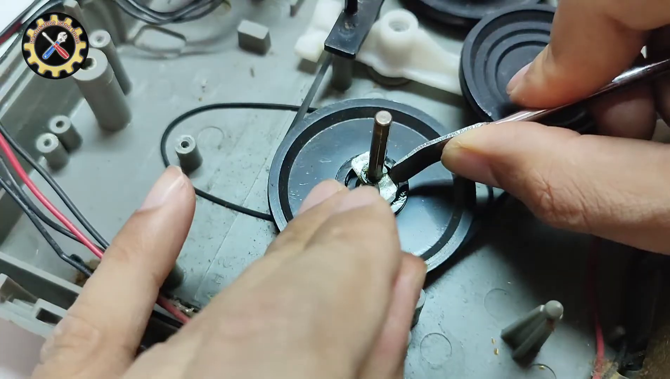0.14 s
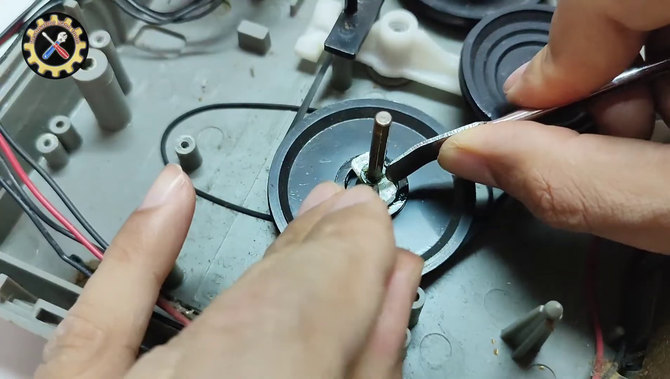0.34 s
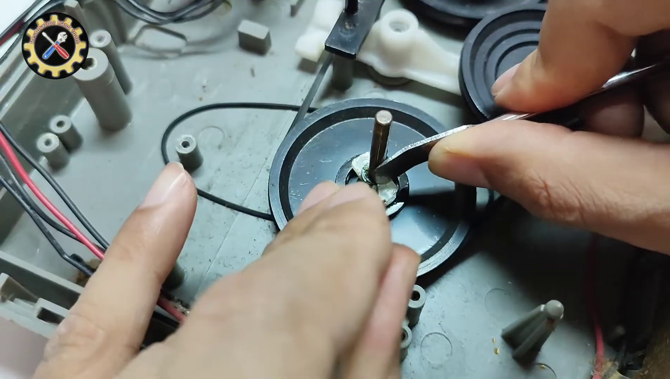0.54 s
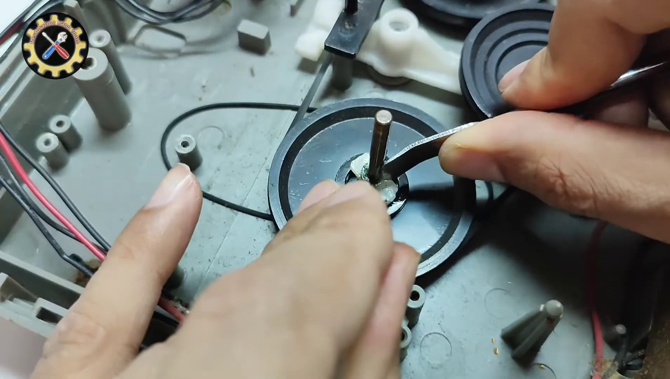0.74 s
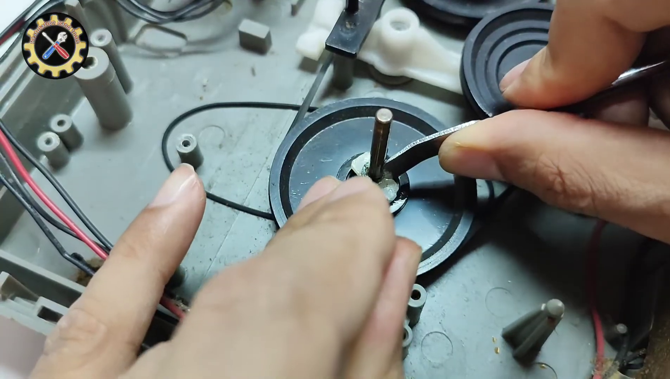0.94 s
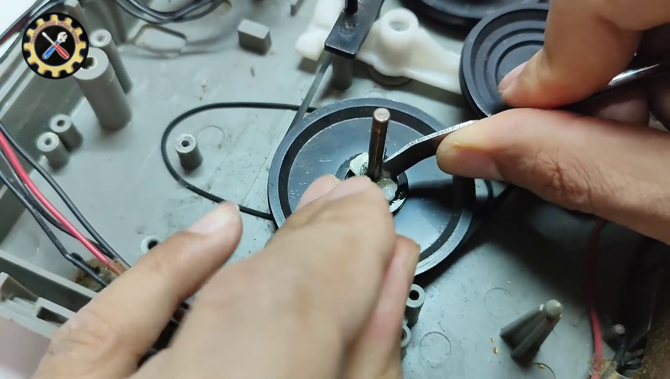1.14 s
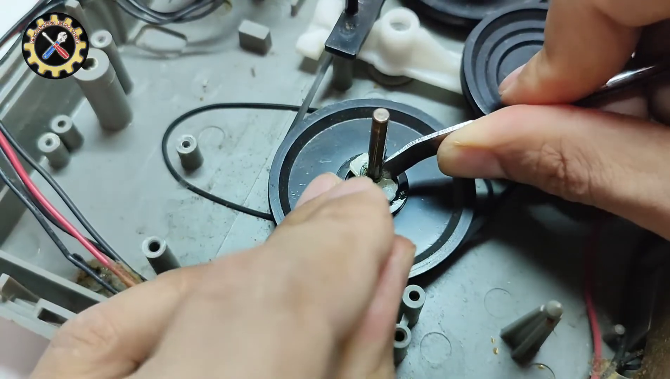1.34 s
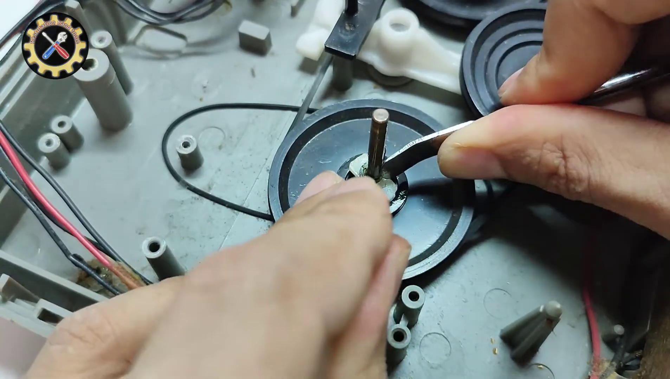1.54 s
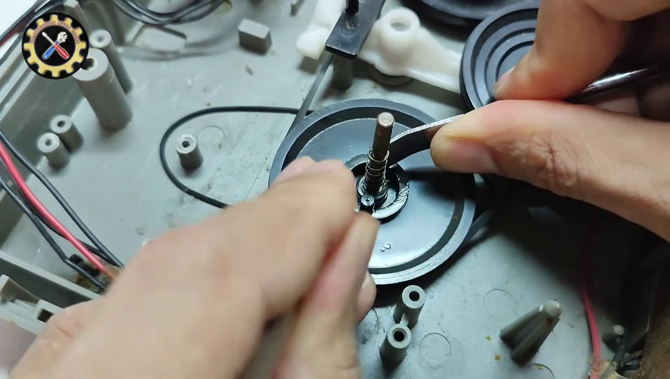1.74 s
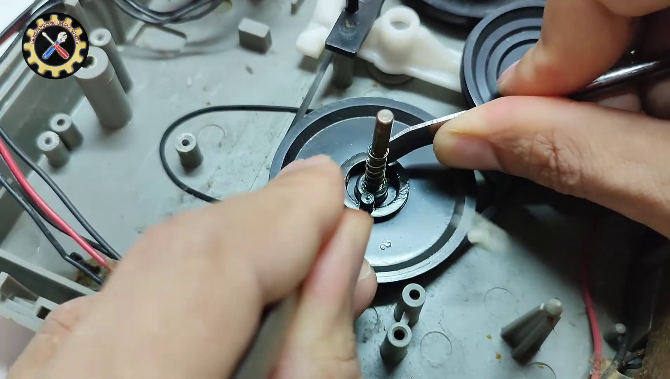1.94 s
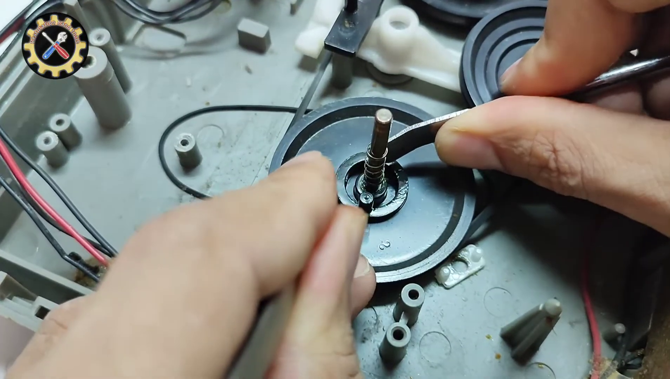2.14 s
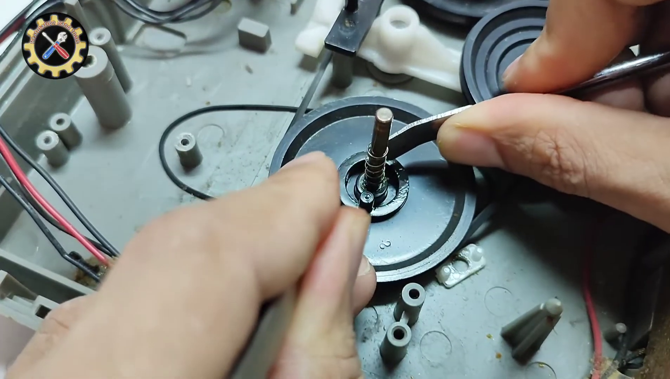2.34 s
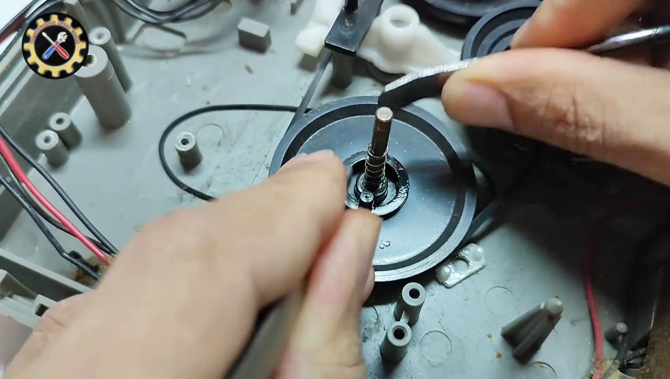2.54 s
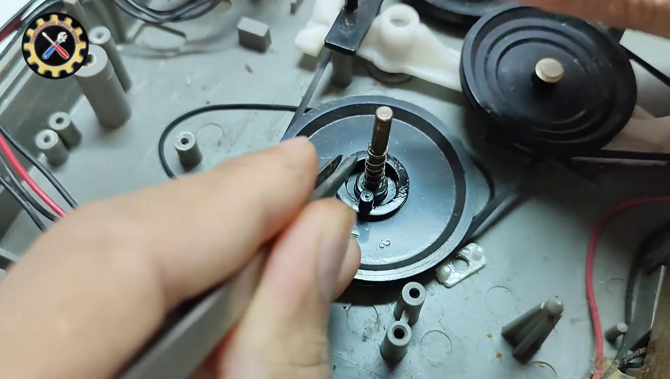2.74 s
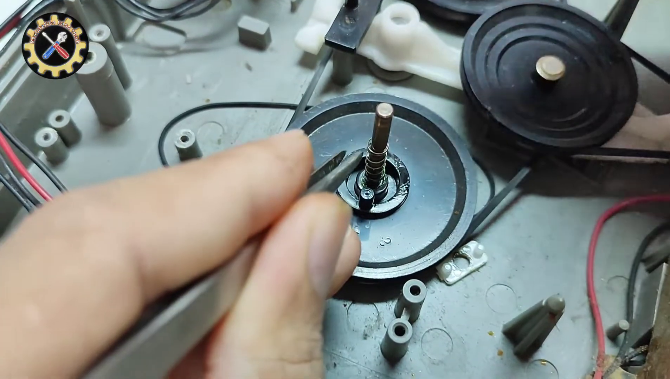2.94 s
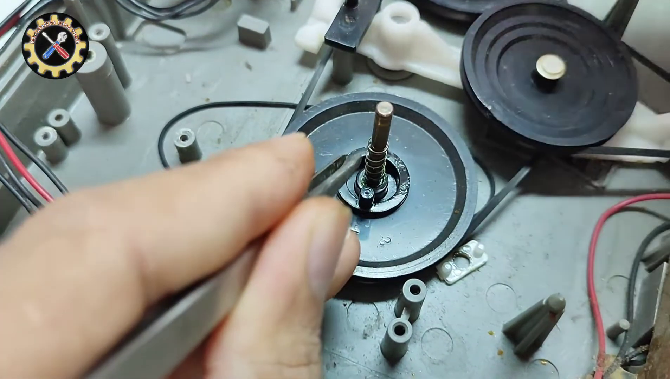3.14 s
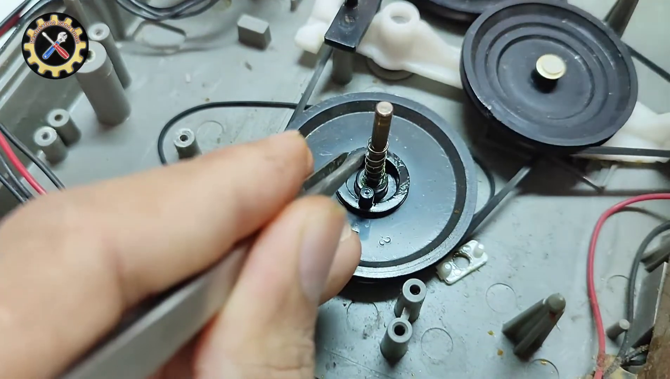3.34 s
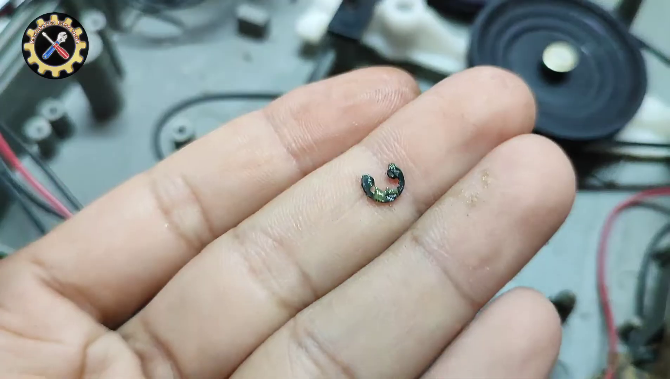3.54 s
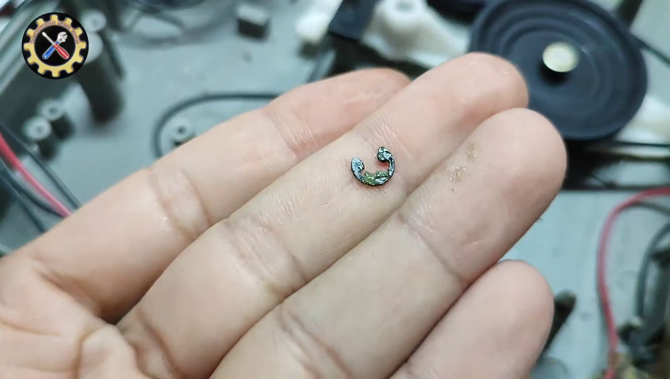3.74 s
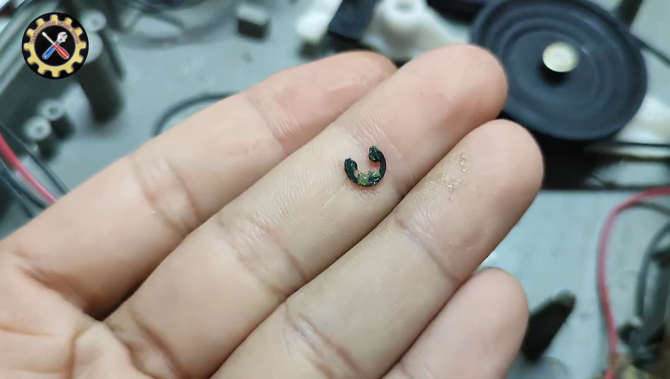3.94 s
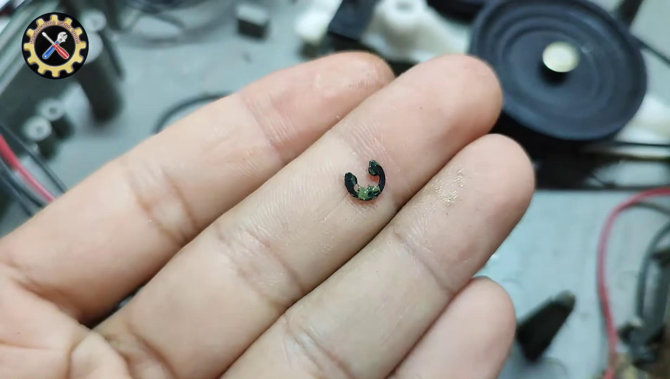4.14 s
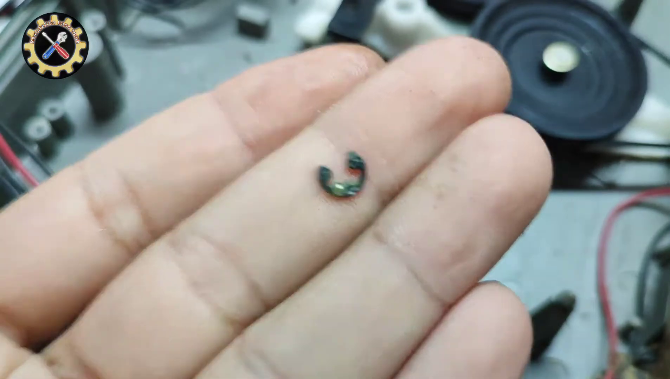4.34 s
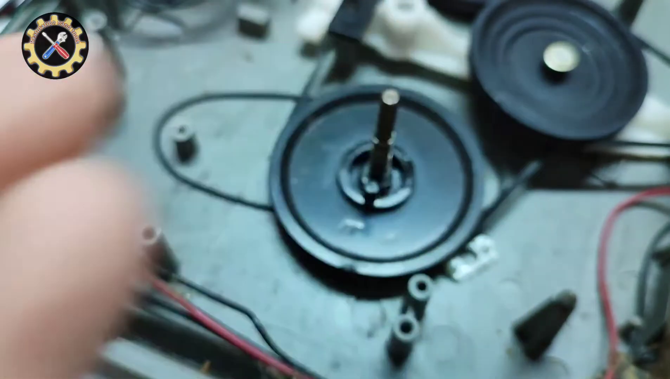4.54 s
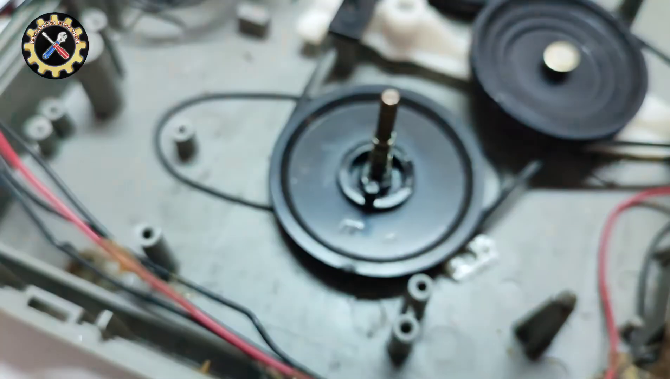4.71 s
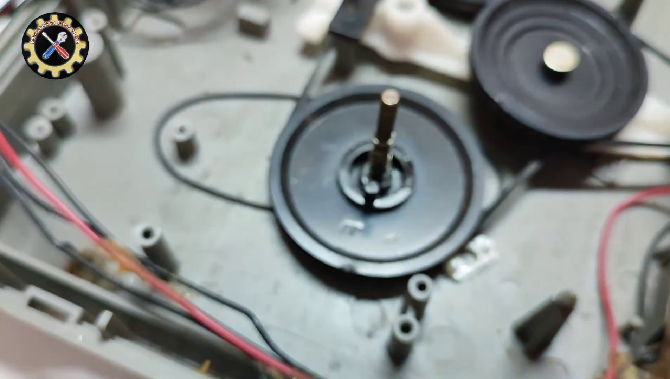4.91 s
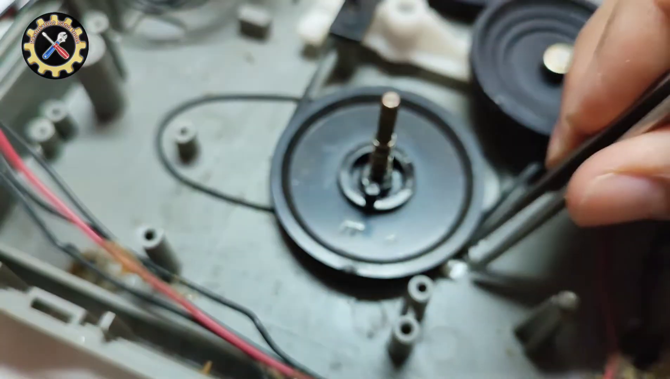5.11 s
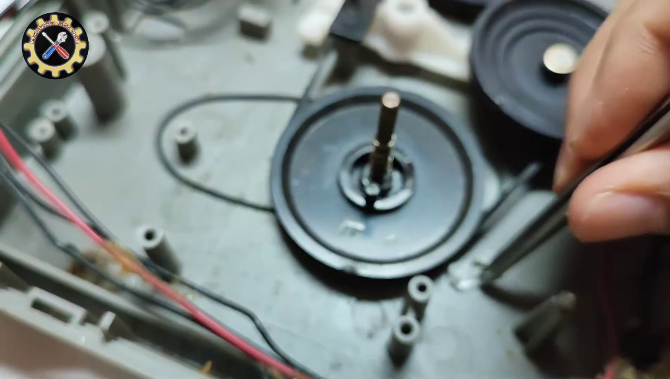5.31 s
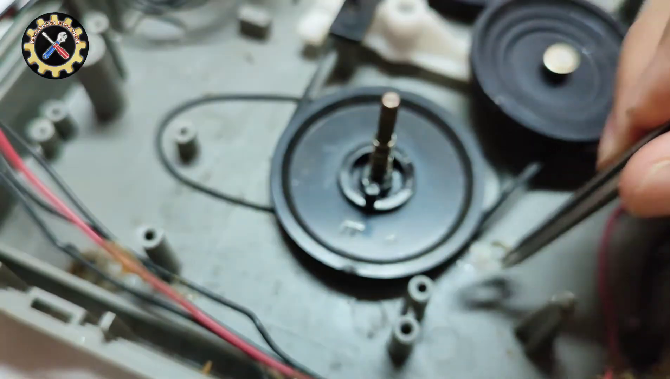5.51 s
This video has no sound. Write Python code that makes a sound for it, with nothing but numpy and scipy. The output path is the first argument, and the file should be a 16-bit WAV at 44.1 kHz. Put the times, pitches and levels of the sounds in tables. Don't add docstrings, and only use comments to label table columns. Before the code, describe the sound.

Very close microphone inside an opened plastic device. Soft skin rubs, light metal ticks and dull desk bumps lead to a sudden loud snap as a small ring springs off, jolting the left side. It hits the base sharply and skips to rest. Small ticks fade into faint room hum; near the end tweezers knock and drag briefly, with a soft low puff of air on the left.

```python
import sys
import numpy as np
from scipy import signal
from scipy.fft import rfft, irfft, next_fast_len
from scipy.io import wavfile

SR = 44100
rng = np.random.default_rng(int(sys.argv[2]) if len(sys.argv) > 2 else 0)


def transcribe(signal):
    frames = np.atleast_2d(signal).T
    limited = np.clip(frames, -1, 1)
    pcm = np.round(limited * 32767).astype(np.int16)
    wavfile.write(sys.argv[1], SR, pcm)


def elevation(decibels):
    levels = np.asarray(decibels, float)
    return 10 ** (levels / 20)


N = 250032
TIME = np.arange(N) / SR


def rms_one(x):
    return x / np.sqrt(np.mean(x ** 2) + 1e-20)


def at_hz(points, hz):
    table_hz, values = np.array(points)[:, 0], np.array(points)[:, 1]
    return np.interp(np.log(np.maximum(hz, 1)), np.log(table_hz), values)


def colour(x, spectrum):
    size = next_fast_len(x.shape[-1])
    gain = elevation(at_hz(spectrum, np.fft.rfftfreq(size, 1 / SR)))
    return irfft(rfft(x, size) * gain, size)[..., :x.shape[-1]]


def resonate(x, hz, width_hz):
    r = np.exp(-np.pi * width_hz / SR)
    poles = [1, -2 * r * np.cos(2 * np.pi * hz / SR), r * r]
    return signal.lfilter([(1 - r * r) / 2, 0, (r * r - 1) / 2], poles, x)


def resonate_twice(x, hz, width_hz):
    return resonate(resonate(x, hz, width_hz), hz, width_hz)


def struck(t, hz, t60, rise_s):
    return np.sin(2 * np.pi * hz * t) * elevation(-60 * t / t60) * (1 - np.exp(-t / rise_s))


def add(out, s, sound):
    i = round(s * SR)
    out[..., i:i + sound.shape[-1]] += sound[..., :N - i]


def balance(left_minus_right_db):
    return elevation(np.array([[left_minus_right_db], [-left_minus_right_db]]) / 2)


def clumps(size, seconds):
    step = max(round(seconds * SR), 8)
    knots = size // 8 + 2
    return np.interp(np.arange(size) / step, np.arange(knots), rng.standard_normal(knots))


def stroke(t, start, hold, db, rise_db_s, fall_db_s):
    early = np.maximum(start - t, 0)
    late = np.maximum(t - start - hold, 0)
    return elevation(db - rise_db_s * early - fall_db_s * late)


# pitch_hz, level_db
AIR = [(8, -0.5), (20, -3.5), (40, -11.5), (62, -10), (85, -16), (130, -12), (200, -10.5), (280, -15.5),
       (500, -18.5), (700, -28.5), (1500, -32.5), (6000, -41.5), (10000, -45), (13500, -42)]
# pitch_hz, correlation (-1 to 1)
LIKENESS = [(60, 0.64), (150, 0.85), (380, 0.58), (950, -0.33), (2380, -0.16), (5980, -0.01),
            (15000, -0.43)]
# pitch_hz, width_hz, level_db
HUMS = [(54.25, 4, -67.5), (190, 7.8, -73), (967, 99, -89), (356, 30, -82), (1340, 4, -94), (1707, 4, -95)]


def room_tone():
    size = next_fast_len(N)
    mid, side = rfft(rng.standard_normal((2, size)))
    hz = np.fft.rfftfreq(size, 1 / SR)
    alike = np.clip(at_hz(LIKENESS, hz), -1, 1)
    both = np.sqrt(1 + alike) * mid + np.sqrt(1 - alike) * side * [[1], [-1]]
    hush = elevation(-62) * rms_one(irfft(both * elevation(at_hz(AIR, hz)), size)[:, :N])
    hums = np.zeros(N)
    for pitch_hz, width_hz, db in HUMS:
        hums += elevation(db) * rms_one(resonate_twice(rng.standard_normal(N), pitch_hz, width_hz * 1.2))
    return (hush + hums) * balance(2.4)


def rubbing(strokes, spectrum, modes, ring, sung_db, rise_db_s, fall_db_s):
    out = np.zeros((2, N))
    sharp = signal.butter(2, 3500, "high", fs=SR, output="sos")
    for start, hold, db, bright_db in strokes:
        t = max(start - 0.12, 0) + TIME[:SR // 2]
        slips = rng.standard_normal((3, len(t))) * elevation(2.5 * clumps(len(t), 0.005))
        slips = slips[:2] + 0.4 * slips[2]
        sung = np.zeros((2, len(t)))
        for hz, width_hz, mode_db in modes:
            waver = elevation(mode_db + 4.5 * clumps(len(t), 0.0201))
            sung += waver * resonate(slips, hz, width_hz * ring)
        grain = rms_one(colour(slips + elevation(sung_db) * sung, spectrum))
        highs = signal.sosfilt(sharp, grain)
        envelope = stroke(t, start, hold, db + 2.0, rise_db_s, fall_db_s)
        add(out, t[0], envelope * (grain + (elevation(bright_db) - 1) * highs))
    return out


# pitch_hz, width_hz, level_db
PARTS = [(700, 170, 3.5), (1050.6, 420, 1.5), (1420, 300, 3), (2000, 490, 3.5), (2600, 500, 0.5),
         (3300, 800, -2.5), (4180, 450, -1), (4800, 370, -5), (5700, 420, 1), (6488, 550, 0),
         (7612, 1500, -2.5), (8980, 940, 0.5), (10280, 1000, -0.5), (11120, 1300, -1.5), (12500, 390, -2),
         (13730, 380, -5.5)]
# start_s, hold_s, level_db, brightness_db
RUB = [(0.0, 0.032, -68, 2.5), (.155, 0.016, -74, 1), (.275, .012, -76.5, 4), (.565, 0.058, -64, 0),
       (.725, 0.11, -71.5, 1.5), (1.645, .02, -69, -6), (2.35, 0.038, -81.5, 0.5), (2.49, .17, -72, 1.5),
       (2.91, 0.14, -76.5, 7.5), (3.065, 0.022, -65.5, 2.5), (3.27, .1, -83.5, 3.5)]
# pitch_hz, level_db
RUB_COLOUR = [(150, -10.5), (300, 5.5), (1000, -6), (1400, -12), (2300, -7.5), (4000, -16), (7000, -16.5),
              (9500, -25), (14500, -27.5)]


def finger_rubs():
    return rubbing(RUB, RUB_COLOUR, PARTS, ring=0.47, sung_db=-3.5, rise_db_s=304, fall_db_s=260.5)


def room_tail(spectrum):
    t = TIME[:SR // 3]
    lumps_db = 1.6 * np.clip(clumps(len(t), .003), -2, 1.5)
    gate_db = 347 * np.maximum(t - 0.13, 0)
    fade_db = lumps_db - 93.5 * t - gate_db
    ripple = elevation(2.3 * clumps(len(t) // 2 + 1, .0006))
    noise = irfft(rfft(rng.standard_normal((2, len(t)))) * ripple, len(t))
    wash = rms_one(colour(noise, spectrum))
    lows = signal.lfilter(*signal.butter(1, 5000, fs=SR), wash)
    highs = (wash - lows) * elevation(-41 * t)
    return (lows + highs) * elevation(fade_db) * np.minimum(t / 0.005, 1)


def contacts(events, tail_colour, pan_db, ring):
    out, t = np.zeros((2, N)), TIME[:SR // 32]
    for s, peak_db, centre_hz, spread_db, chatter_s, wet_db in events:
        swell = (1 - np.exp(-t / .0003)) * np.exp(-t / max(chatter_s, 5e-4))
        force = 1.5 + rng.exponential(1, len(t))
        impacts = rng.standard_normal((2, len(t))) * force * swell
        body, sign = np.zeros((2, len(t))), 1
        for hz, width_hz, db in PARTS:
            near_db = db - spread_db * abs(np.log2(hz / centre_hz))
            gain = sign * elevation(near_db + rng.normal(0, 1.5))
            body += gain * resonate_twice(impacts, hz, width_hz * ring)
            sign = -sign
        add(out, s, elevation(peak_db + 5) * body / np.abs(body).max())
        add(out, s, elevation(peak_db + wet_db - 18) * room_tail(tail_colour))
    return out * balance(pan_db)


# start_s, peak_db, centre_hz, spread_db_per_octave
TICKS = [(.0164, -50.5, 3950, 5), (.0598, -51, 2600, 8), (.135, -66, 2000, 23), (0.5763, -47.5, 3360, 9.5),
         (.594, -52, 5140, 23), (.824, -54, 2600, 20), (1.394, -52.5, 1390, 7.5), (1.416, -71, 7000, 16),
         (1.4345, -51, 1660, 14), (1.513, -61, 2000, 3.5), (1.640, -56, 3500, 4), (1.956, -64, 2930, 16),
         (2.464, -58, 4020, 4), (2.555, -61.5, 1950, 19), (2.573, -43.5, 2150, 8.5),
         (2.635, -63, 5470, 5.5), (2.655, -62.5, 4000, 6), (2.947, -60.5, 3250, 32),
         (3.078, -58.5, 2600, 14), (3.87, -65.5, 2992, 10.5), (4.59, -71, 11000, 3.5),
         (5.1990, -40, 1230, 5.5), (5.25, -51.5, 3300, 8), (5.604, -60.5, 3180, 10)]


def tweezer_ticks():
    chatter_s, wet_db = 0.0049, -16
    ticks = [(*tick, chatter_s, wet_db) for tick in TICKS]
    return contacts(ticks, RUB_COLOUR, pan_db=1.5, ring=1.0)


# start_s, peak_db, pitch_hz, t60_s
BUMPS = [(0.018, -55, 102, 0.15), (0.288, -45, 102, 0.044), (0.329, -54, 88, 0.09),
         (0.544, -57.5, 136.6, 0.17), (0.567, -50, 102, 0.14), (0.793, -59, 109, 0.14),
         (1.267, -52, 94.4, 0.064), (1.34, -51, 87, 0.034), (1.39, -50, 134, 0.057),
         (1.408, -44.5, 126, 0.14), (1.439, -50, 94, 0.057), (1.462, -47.5, 118.3, 0.13),
         (1.639, -47, 94, 0.14), (2.01, -50.5, 102, 0.062), (2.509, -52.5, 102, 0.072),
         (2.538, -54.5, 85.9, 0.11), (2.999, -57.5, 129.9, 0.081), (5.199, -48.5, 111.1, 0.06),
         (5.596, -70.5, 111.4, 0.063)]


def desk_bumps():
    out, t = np.zeros(N), TIME[:SR // 3]
    for s, peak_db, hz, t60 in BUMPS:
        t60 = max(t60, .02)
        modes = struck(t, hz, t60, 0.0025)
        modes += elevation(-10) * struck(t, 2.3 * hz, .6 * t60, 0.0031)
        modes += elevation(-14.5) * struck(t, 2.5 * hz, 0.59 * t60, .004)
        add(out, s, elevation(peak_db + 8.5) * modes)
    return out


# start_s, hold_s, level_db, brightness_db
PRESS = [
    (1.3, .05, -71.5, 3),
    (1.398, 0.021, -58.5, 3),
    (1.437, 0.016, -53.5, -4),
    (1.48, 0.051, -76, 2),
]
# pitch_hz, level_db
PRESS_COLOUR = [(120, -23), (200, 5.5), (556, -4), (641, -12), (854, -5.5), (1390, -20), (2460, -17.5),
                (4520, -41), (4770, -35), (7210, -24.5), (14500, -61)]


def finger_presses():
    return rubbing(PRESS, PRESS_COLOUR, PARTS, ring=0.99, sung_db=-6.5, rise_db_s=448, fall_db_s=600)


# start_s, peak_db, centre_hz, chatter_s, wet_db
SNAP = [
    (1.667, -45, 3004, 0.012, -30),
    (1.6743, -28.5, 7000, .004, -35),
    (1.6773, -9, 9540, 0.002, -8.5),
    (1.6903, -12.5, 11460, .002, -16),
    (1.7205, -26, 4800, 0.004, -7.5),
    (1.7245, -22.5, 9120, .003, -7.5),
    (1.7305, -36, 3000, .005, -12),
]
# pitch_hz, level_db
SNAP_COLOUR = [(88, -36), (150, -3.5), (302, -3.5), (519, -12.5), (668, -6.5), (1020, -19), (1110, -9),
               (1730, -11), (11100, -13.5), (14300, -20), (15500, -80.5)]


def ring_snap():
    spread_db = 3
    snaps = [(s, db, hz, spread_db, chatter_s, wet_db) for s, db, hz, chatter_s, wet_db in SNAP]
    return contacts(snaps, SNAP_COLOUR, pan_db=4.5, ring=2.08)


def panel(knocks, modes, pan_db):
    out, t = np.zeros(N), TIME[:SR // 4]
    for s, peak_db in knocks:
        ringing = np.zeros(len(t))
        for hz, db, t60 in modes:
            gain = rng.choice([-1, 1]) * elevation(peak_db + db - 6 + rng.normal(0, 1.5))
            ringing += gain * struck(t, hz, t60, 0.0002)
        add(out, s, ringing)
    return out * balance(pan_db)


# start_s, peak_db
SHUDDERS = [(1.669, -37.5), (1.677, -22), (1.683, -24.5), (1.691, -22.5), (1.70, -39), (1.722, -34),
            (1.755, -38), (1.77, -38), (1.785, -39), (1.80, -40), (1.84, -46.5)]
# pitch_hz, level_db, t60_s
CHASSIS = [(102, 0.5, 0.062), (218, -0.5, 0.08), (263.3, 0, 0.14), (344, -10, 0.12), (415, -9.5, .07),
           (559, -8, 0.081), (782.6, -12, 0.06)]


def chassis_shudder():
    return panel(SHUDDERS, CHASSIS, pan_db=6.5)


# start_s, size (full scale), rise_s, fall_s
JOLT = [
    (1.6776, -.37, .0004, .024),
    (1.6776, .075, .03, .17),
    (1.778, .082, .006, .1),
]


def capsule_jolt():
    offset = np.zeros(N)
    for s, size, rise_s, fall_s in JOLT:
        t = np.maximum(TIME - s, 0)
        offset += size * (1 - np.exp(-t / rise_s)) * np.exp(-t / fall_s)
    no_dc = signal.butter(1, .5, "high", fs=SR)
    return signal.lfilter(*no_dc, offset) * [[1], [0]]


# start_s, peak_db, centre_hz, spread_db_per_octave, chatter_s
BOUNCE = [
    (2.0175, -25, 6030, 3, 0.011),
    (2.0204, -9, 5000, 3, .0024),
    (2.0569, -17, 12500, 7, 0.0037),
    (2.0600, -15.5, 5202, 11, 0.004),
    (2.1104, -25.5, 3270, 7, 0.004),
    (2.144, -38.5, 2340, 13, 0.0035),
]
# pitch_hz, level_db
BOUNCE_COLOUR = [(350, -38), (600, -3), (1860, -10.5), (2440, 1.5), (5980, -1), (7640, -2), (10600, -7.5),
                 (12100, -2), (14700, -14), (15500, -56)]


def part_bounces():
    bounces = []
    for hit in BOUNCE:
        wet_db = -20.5 if hit[0] > 2.04 else -9.5
        bounces.append((*hit, wet_db))
    too_small = signal.butter(4, 680, "high", fs=SR, output="sos")
    return signal.sosfilt(too_small, contacts(bounces, BOUNCE_COLOUR, pan_db=-0.7, ring=2.07))


# start_s, peak_db
KNOCKS = [
    (2.019, -41),
    (2.576, -45),
    (5.202, -34),
    (5.205, -40),
    (5.214, -38),
    (5.237, -47),
]
# pitch_hz, level_db, t60_s
PLATE = [(244, -7, 0.051), (278.9, -7.5, 0.063), (358, -9, 0.13), (485, -2.5, .08), (566, -11, 0.047),
         (714, -5.5, 0.046), (936, -10, 0.024), (1247, -10, 0.078)]


def plate_knocks():
    return panel(KNOCKS, PLATE, pan_db=3.0)


# start_s, hold_s, level_db, brightness_db
DRAG = [
    (5.21, .025, -76, -8),
    (5.246, .02, -57.5, 2.5),
    (5.275, 0.036, -64, 1),
    (5.35, 0.046, -66, 2),
]
# pitch_hz, level_db
DRAG_COLOUR = [(300, -3.5), (480, -4), (710, -4.5), (1000, -7), (1600, -13.5), (2300, -17), (3300, -12),
               (4500, -19), (14500, -31)]
# pitch_hz, width_hz, level_db
TINES = [(479, 35, 0), (710, 27, 5.5), (880, 42, -18), (1750, 70, 2), (2170, 44, 4.5), (2670, 40, -3),
         (3300, 41, -4), (4950, 90, -9.5), (6430, 90, 4.5)]


def tweezer_drag():
    return rubbing(DRAG, DRAG_COLOUR, TINES, ring=0.95, sung_db=8, rise_db_s=500, fall_db_s=450)


# start_s, hold_s, level_db
DRAUGHT = [
    (5.36, 0.035, -44),
    (5.435, 0.0063, -42),
    (5.476, 0.17, -59.5),
]


def hand_draught():
    band = signal.butter(2, [20, 90], "band", fs=SR, output="sos")
    gusts = rms_one(signal.sosfilt(band, rng.standard_normal(N)))
    puffs = sum(stroke(TIME, *puff, rise_db_s=901, fall_db_s=402) for puff in DRAUGHT)
    return gusts * puffs * [[1], [0]]


def scene():
    handling = finger_rubs() + tweezer_ticks() + desk_bumps() + finger_presses()
    release = ring_snap() + chassis_shudder() + capsule_jolt()
    landing = part_bounces() + plate_knocks()
    return room_tone() + handling + release + landing + tweezer_drag() + hand_draught()


def band_limit(x):
    return signal.sosfilt(signal.butter(12, 16290, fs=SR, output="sos"), x)


def record(dry):
    rounded = np.tanh(dry)
    top_cut = signal.cheby1(12, .5, 14400, fs=SR, output="sos")
    return band_limit(signal.sosfilt(top_cut, rounded))


dry = scene()
out = record(dry)
transcribe(out)
```